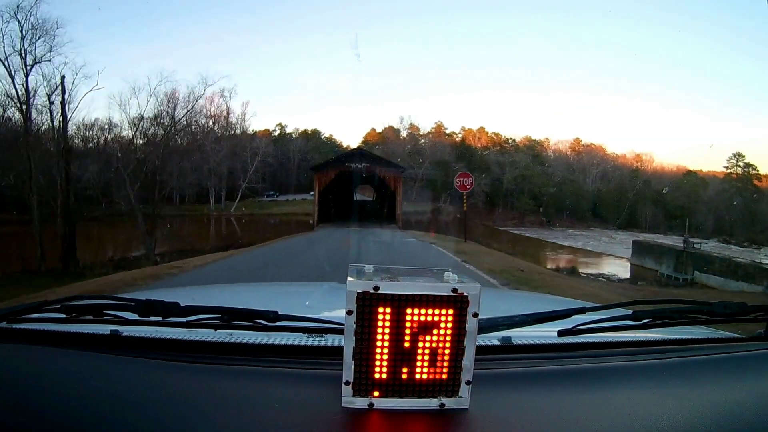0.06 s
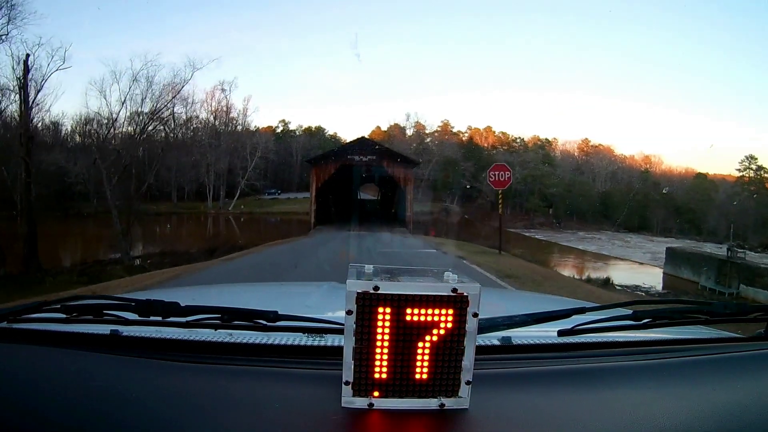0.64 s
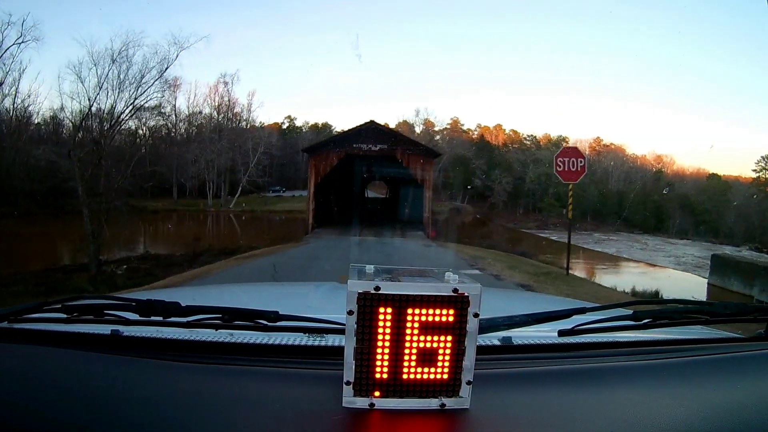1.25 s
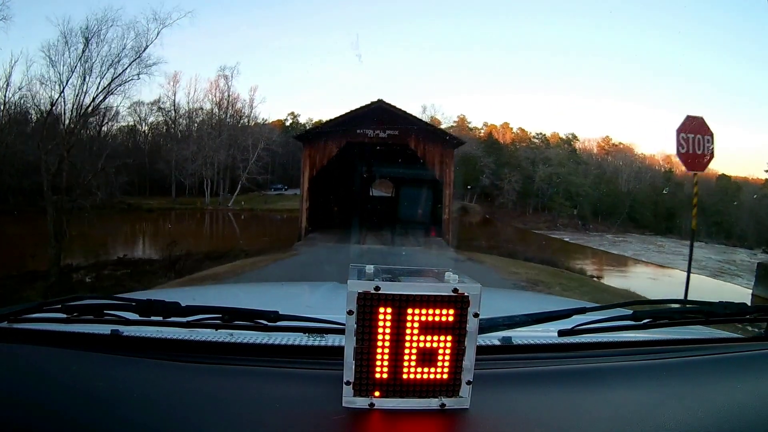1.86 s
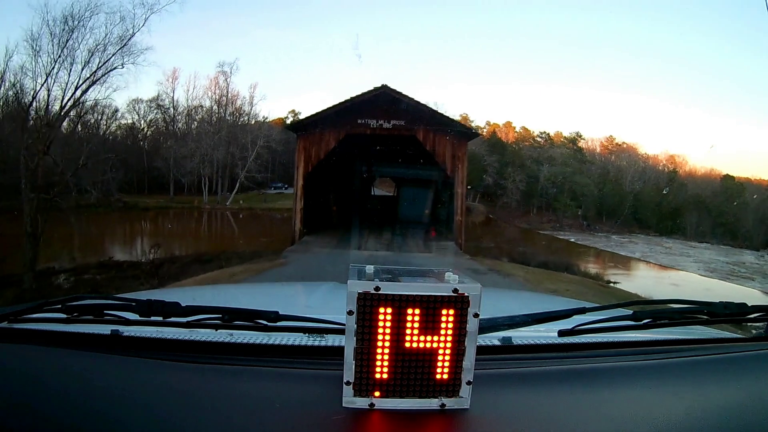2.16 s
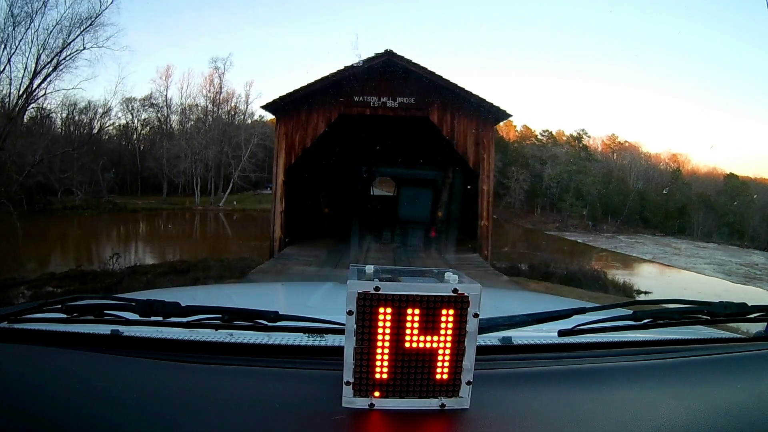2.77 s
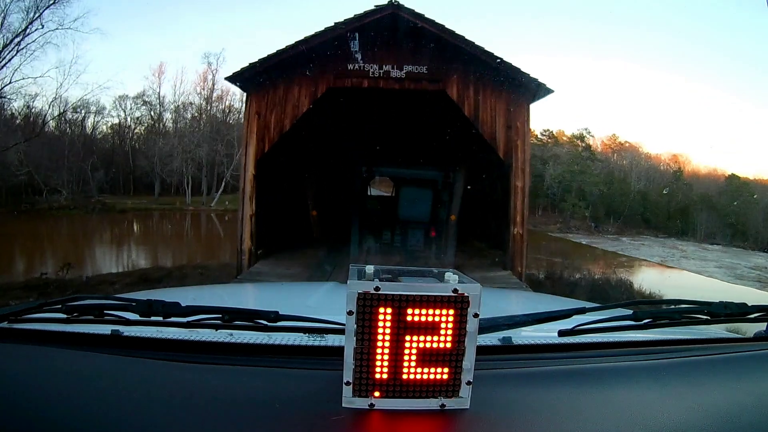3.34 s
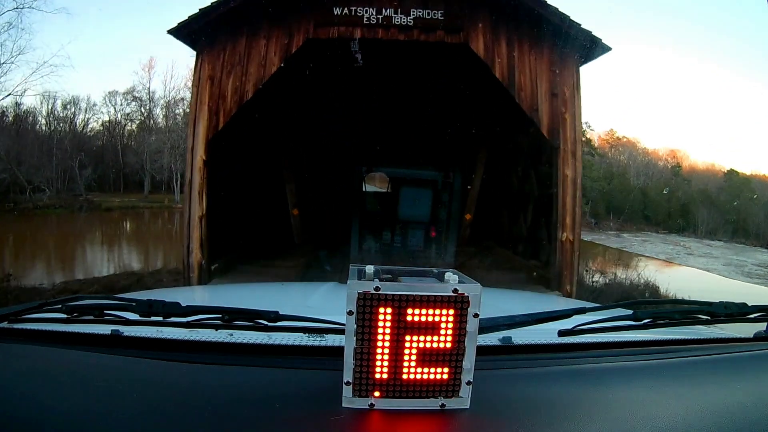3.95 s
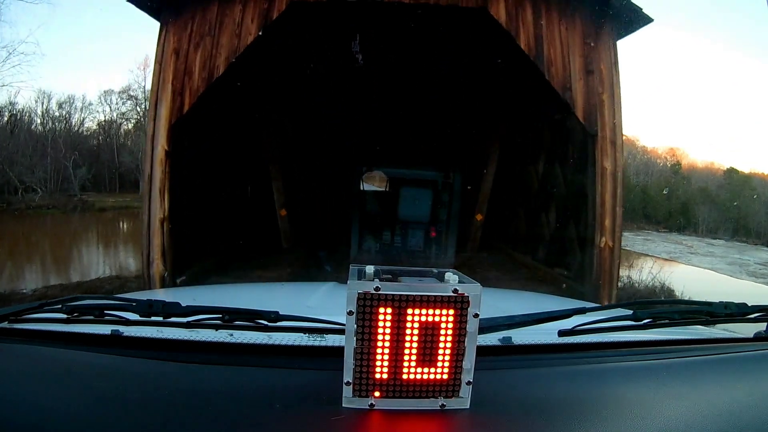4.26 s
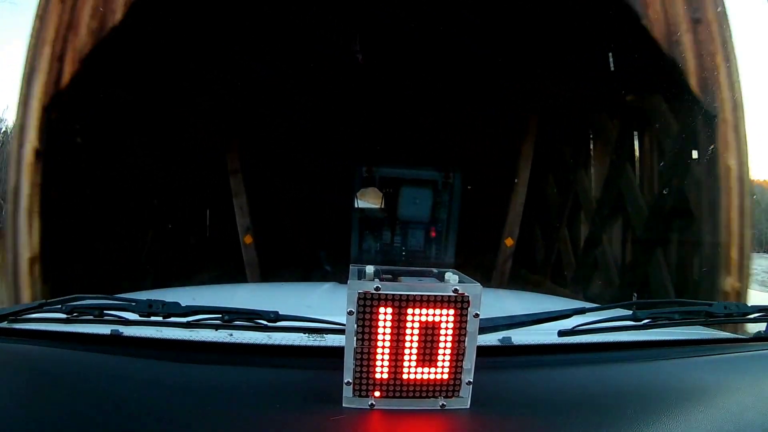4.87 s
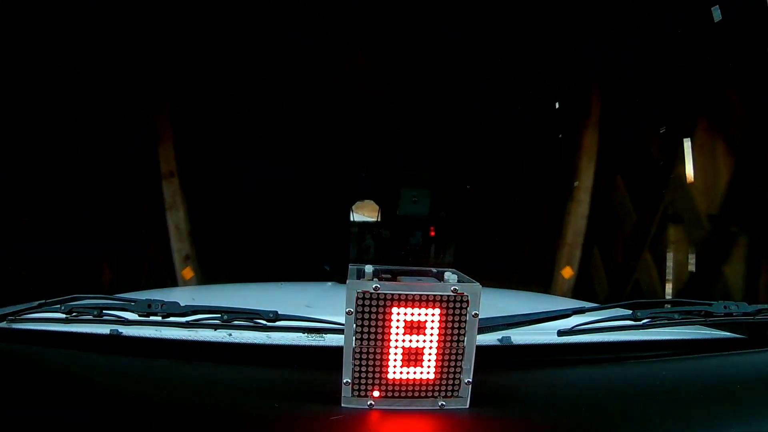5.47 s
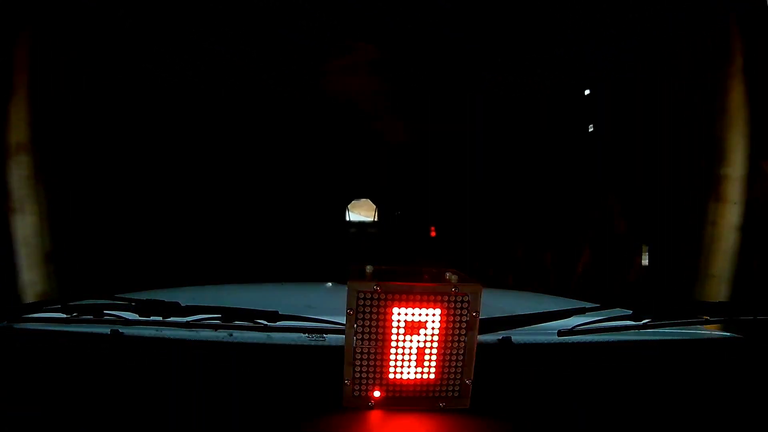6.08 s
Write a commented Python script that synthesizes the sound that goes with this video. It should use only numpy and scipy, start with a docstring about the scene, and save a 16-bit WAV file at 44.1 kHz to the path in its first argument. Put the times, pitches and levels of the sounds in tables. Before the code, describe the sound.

A slowing pickup truck heard from inside, with low engine hum, road rumble and dashboard knocks, then thudding over hollow wooden bridge planks.

```python
"""Pickup truck rolling onto a wooden bridge

Inside the cab, windows shut, microphone at the dashboard. The truck slows steadily down a paved road
and onto the planks; the engine sinks to idle under the tyre rumble, then picks up. Front and rear
wheels cross each joint in turn, rocking the cab and stirring hollow boards and loose fittings.
Heavy jolts thud through the chassis; close by, dashboard trim knocks and ticks."""
import sys
import numpy as np
from scipy import signal
from scipy.fft import rfft, irfft, next_fast_len
from scipy.io import wavfile
from scipy.ndimage import uniform_filter1d, map_coordinates

SR = 44100
rng = np.random.default_rng(int(sys.argv[2]) if len(sys.argv) > 2 else 0)


def generate_wav(sig):
    """Save sig (samples, or channels by samples) to the path in sys.argv[1] as 16-bit PCM at SR."""
    pcm = np.round(np.clip(np.atleast_2d(sig).T, -1, 1) * 32767).astype(np.int16)
    wavfile.write(sys.argv[1], SR, pcm)


N = 269892


def amp(db):
    """Decibels to gain."""
    return 10 ** (np.asarray(db) / 20)


def fade(t, t60):
    """Exponential decay, 60 dB down after t60 seconds."""
    return np.exp(-np.log(1000) * t / t60)


def wobble(rate):
    """A smooth random curve, rate knots a second."""
    knots = rng.standard_normal(int(N * rate / SR) + 4)
    return map_coordinates(knots, [np.arange(N) * rate / SR])


def colour(x, spectrum):
    """Filter x by (frequency [Hz], level [dB]) points."""
    size = next_fast_len(len(x) + 8192)
    hz, db = np.transpose(spectrum)
    gain = amp(np.interp(np.log(np.fft.rfftfreq(size, 1 / SR) + 1), np.log(hz), db))
    return irfft(rfft(x, size) * gain, size)[:len(x)]


def noise(spectrum):
    """Coloured noise of rms 1."""
    x = colour(rng.standard_normal(N), spectrum)
    return x / np.sqrt(np.mean(x ** 2) + 1e-20)


def ring(modes, attack, detune, scatter_db):
    """One blow on a set of modes, peak 1; the point of contact changes their strengths and pitches."""
    t = np.arange(SR // 4) / SR
    hz, db, t60 = np.transpose(modes)[:, :, None]
    strength, pitch, phase = rng.standard_normal((3, len(modes), 1))
    waves = np.sin(2 * np.pi * hz * (1 + detune * pitch) * t + phase)
    onset = 1 - np.exp(-(t / attack) ** 2)
    x = onset * np.sum(amp(db + scatter_db * strength) * fade(t, t60) * waves, axis=0)
    return x / np.abs(x).max()


def crack(spectrum, t60, tail_db, tail_t60):
    """A sharp contact with a short scattered tail in the cab, peak 1."""
    t = np.arange(SR // 4) / SR
    onset = 1 - np.exp(-(t / .0005) ** 2)
    decay = fade(t, t60) + amp(tail_db) * fade(t, tail_t60)
    x = colour(rng.standard_normal(len(t)), spectrum) * onset * decay
    return x / np.abs(x).max()


def add(track, s, sound):
    """Mix a sound into the track at time s."""
    part = track[max(round(s * SR), 0):][:len(sound)]
    part += sound[:len(part)]


START_M_PER_S, BRAKING_M_PER_S2, WHEELBASE_M = 8.3, .75, 3.86
def motion():
    """Time [s], speed [m/s] and distance [m] of the steadily slowing truck."""
    t = np.arange(N) / SR
    speed = START_M_PER_S - BRAKING_M_PER_S2 * t
    return t, speed, np.cumsum(speed) / SR


def pump(start_s=1.4, length_s=1.55, free_hz=1388, sag_hz=52.2):
    """Far in the background, a pump's whine comes up and sags in pitch while it is loaded."""
    progress = np.clip((np.arange(N) / SR - start_s) / length_s, 0, 1)
    load = np.abs(np.sin(np.pi * progress))
    whine = np.sin(2 * np.pi * np.cumsum(free_hz - sag_hz * load) / SR)
    return amp(-72.5 + 2.6 * wobble(15)) * np.sqrt(2 * load) * whine


# Engine, just ahead of the cab: (time [s], firing rate [Hz], level [dB])
ENGINE_RUN = [(0, 38.53, -38), (.55, 35.47, -41), (1.7, 31.3, -47), (3.05, 33, -43), (4.3, 30.1, -48.5),
              (5.3, 29.99, -43), (5.65, 38.5, -37.5), (6.12, 51, -40.5)]
# Its harmonics: (order [multiple of the firing rate], level [dB])
FIRING_ORDERS = [(1, 0), (2, -10), (3, -18.5), (4, -17), (5, -12.5), (6, -17), (7, -17.5), (8, -24)]
def engine(full_throttle_hz_per_s=28, boost_db=6):
    """Firing orders hum through the firewall, each a little unsteady; throttle lifts the upper ones."""
    times, *columns = np.transpose(ENGINE_RUN)
    firing_hz, hum_db = [np.interp(np.arange(N) / SR, times, column) for column in columns]
    climb = np.gradient(firing_hz) * SR / full_throttle_hz_per_s
    throttle = uniform_filter1d(np.clip(climb, 0, 1), size=SR // 5)
    phase = 2 * np.pi * np.cumsum(firing_hz * (1 + .00812 * wobble(9))) / SR
    hum = np.zeros(N)
    for order, db in FIRING_ORDERS:
        gain = amp(db + (order > 1) * boost_db * throttle + 2.16 * wobble(7))
        hum += gain * np.sin(order * phase + rng.uniform(0, 2 * np.pi))
    return amp(hum_db) * hum


# Road noise all around the microphone, three spectra: (frequency [Hz], density [dB])
BODY_SHAKE = [(12, -30.5), (22, -11.5), (35, -1.5), (55, 0.5), (74, 0), (88, -7.5), (130, -19),
              (250, -71.5)]
CAB_AIR_BOOM = [(60, -27), (95, -1), (112, 1.5), (122, 8), (138, -0.5), (168, -3), (190, 1), (215, -0.5),
                (275, -0.5), (305, -9), (400, -12), (450, -19), (700, -36.5), (1500, -80)]
TREAD_RUSH = [(200, -25), (450, 3), (750, 0.5), (1000, -3), (1350, -6), (1600, -11.5), (2000, -15.5),
              (2400, -21), (3200, -25), (4300, -29.5), (7000, -40.5), (14000, -67)]
def road():
    """Uneven pavement shakes the body; tyres drone and rush through the glass. All ease with speed."""
    _, speed, _ = motion()
    halvings = np.log2(START_M_PER_S / speed)
    texture = wobble(25)
    shake = amp(-39.2 - 7.3 * halvings) * noise(BODY_SHAKE)
    drone = amp(-39 - 7 * halvings + 1.08 * texture) * noise(CAB_AIR_BOOM)
    tread = amp(-56.5 - .76 * halvings + .56 * texture + .41 * wobble(60)) * noise(TREAD_RUSH)
    return shake + drone + tread


# Plastic ticks close to the microphone: (time [s], level [dB], top edge [Hz])
TRIM_TICKS = [(.424, -53.5, 3400), (.608, -51, 4900), (.816, -53.5, 6800), (1.35, -56, 4300),
              (1.797, -57, 5500), (3.633, -57.5, 5000), (3.685, -57, 5000), (3.863, -52, 6000),
              (4.549, -54.5, 5500), (4.913, -55.5, 6800), (5.486, -45, 6600), (5.891, -52, 7000)]
# Ring of the plastic: (frequency [Hz], level [dB], t60 [s])
PLASTIC_MODES = [(2094, 0.5, 0.077), (2360, 1.5, 0.046), (2885, -1.5, 0.037), (3300, -9, 0.044),
                 (4160, -4, .06), (4620, -10, .04), (5880, -9, 0.043), (6370, -14.5, 0.031)]
# Snap of the contact: (frequency [Hz], density [dB])
PLASTIC_SNAP = [(700, -23), (1700, 6), (2500, 1.5), (4500, -6.5), (6500, -9.5), (7800, -28), (12000, -33)]
# Trim rubbing briefly: (time [s], peak [dB], pitch [Hz])
TRIM_SQUEAKS = [(.28, -50, 1116), (4.528, -49, 1380), (4.757, -50, 1055), (5.355, -51, 1026)]
def trim(settle_s=.009, settle_db=-9):
    """Small plastic parts tick, touch again more weakly, and squeak."""
    out = np.zeros(N)
    for s, db, top_hz in TRIM_TICKS:
        lowpass = signal.butter(4, top_hz, fs=SR, output='sos')
        for delay, drop_db in [(0, 0), (settle_s, settle_db)]:
            body = amp(-3) * ring(PLASTIC_MODES, attack=.0005, detune=.03, scatter_db=2)
            snap = crack(PLASTIC_SNAP, t60=.01, tail_db=-14, tail_t60=.07)
            add(out, s + delay, amp(db + drop_db) * signal.sosfilt(lowpass, body + snap))
    t = np.arange(SR // 50) / SR
    for s, db, hz in TRIM_SQUEAKS:
        add(out, s - t.mean(), amp(db) * np.hanning(len(t)) * np.sin(2 * np.pi * hz * t))
    return out


# Dashboard panel, close up: (time [s], level [dB], hard edge [relative dB], rebound [relative dB])
PANEL_KNOCKS = [(.759, -35, -5, 0.5), (.784, -42, -3, -20), (1.031, -43, -11, -2.5),
                (1.588, -44.5, -26, -10), (2.987, -40, -11.5, -20), (3.017, -43, -11, -20),
                (3.162, -37.5, -19, 1.5), (3.275, -40, -25, -18), (3.501, -41.5, -19, -20),
                (3.592, -39.5, -21, -3.5), (3.69, -45.5, -8, -20), (3.833, -45, -11, -17),
                (3.858, -32.5, -21, -6.5), (4.211, -40.5, -22, -20), (4.351, -41.5, -14, -22),
                (4.492, -40, -12, -2), (4.61, -34, -20, -6.5), (4.912, -39.5, -10.5, -20),
                (5.034, -44, -8, -20), (5.054, -42, -18, -20), (5.067, -46.5, 1.5, -22),
                (5.486, -45.5, -1, -20), (5.933, -36, -15, -20), (6.092, -36, -11.5, -20)]
# Ring of the panel: (frequency [Hz], level [dB], t60 [s])
PANEL_MODES = [(663.4, -1, 0.047), (751, -1.5, 0.05), (854, -3.5, 0.034), (998, -14.5, 0.028),
               (1162, -12, 0.043), (1368, -18.5, 0.036)]
# Its hard contact: (frequency [Hz], density [dB])
PANEL_EDGE = [(700, -22), (1200, -14.5), (1700, 7), (2050, 6.5), (2450, -17), (3500, -21.5), (7000, -50),
              (12000, -70)]
def panel(rebound_s=.056, settle_s=.006, settle_db=-5):
    """A loose panel knocks, swings back to strike again, and chatters once after each contact."""
    out = np.zeros(N)
    for s, db, edge_db, rebound_db in PANEL_KNOCKS:
        for hit_s, hit_db in [(s, db), (s + rebound_s, db + rebound_db)]:
            for delay, drop_db in [(0, 0), (settle_s * rng.uniform(.7, 1.3), settle_db)]:
                body = ring(PANEL_MODES, attack=.0013, detune=.025, scatter_db=2.5)
                edge = amp(edge_db) * crack(PANEL_EDGE, t60=.011, tail_db=-15, tail_t60=.072)
                add(out, hit_s + delay, amp(hit_db + drop_db) * (body + edge))
    return out


def fittings(count=250):
    """Loose fittings around the cab tap at random, harder and more often while the truck rocks."""
    out = np.zeros(N)
    shaking = np.hypot(amp(-52.5), amp(-15.5) * rocking())  # smooth road plus jolts
    times = np.interp(rng.uniform(0, 1, count), np.cumsum(shaking) / shaking.sum(), np.arange(N) / SR)
    for s, pitch, force in zip(times, rng.uniform(.9, 1.602, count), rng.standard_normal(count)):
        modes = np.array(PANEL_MODES) * [pitch, 1, 1 / pitch]  # smaller parts ring higher and shorter
        body = ring(modes, attack=.0011, detune=.054, scatter_db=2)
        snap = amp(-14.5) * crack(PLASTIC_SNAP, t60=.0096, tail_db=-11.5, tail_t60=.057)
        add(out, s, amp(2 * np.tanh(force)) * (body + snap))
    return out * shaking


# Joints and humps under the wheels: (front crossing time [s], front jolt [dB], rear jolt [dB])
ROAD_JOINTS = [(.27, -31, -36), (3.075, -31.5, -29.5), (3.125, -30, -40), (4.469, -29.5, -28),
               (4.515, -28, -26.5), (4.6, -31, -48), (4.654, -29, -30)]
def jolts():
    """Time [s] and level [dB] of each axle on each joint; the rear follows one wheelbase later."""
    t, _, metres = motion()
    for front_s, front_db, rear_db in ROAD_JOINTS:
        joint_m = np.interp(front_s, t, metres)
        yield front_s, front_db
        yield np.interp(joint_m + WHEELBASE_M, metres, t), rear_db


def rocking(rise_s=.03, t60=.74):
    """How hard the truck rocks: every jolt adds energy that dies away."""
    energy = np.zeros(N)
    for s, db in jolts():
        age = np.maximum(np.arange(N) / SR - s, 0)
        energy += (amp(db) * (1 - np.exp(-age / rise_s)) * fade(age, t60)) ** 2
    return np.sqrt(energy)


# Bridge planks, heard through the floor: (frequency [Hz], density [dB])
HOLLOW_BOARDS = [(150, -21.5), (240, -2.5), (310, 1), (390, 1), (460, -11.5), (700, -16.5), (1200, -36),
                 (3000, -55)]
def deck(arrival_s=2.98, entry_s=.6, growth_db_per_m=.78):
    """The boards rumble hollowly under the tyres, louder further along the span and after jolts."""
    t, _, metres = motion()
    on_deck = np.clip((t - arrival_s) / entry_s, 0, 1)
    along_m = metres - np.interp(arrival_s, t, metres)
    rolling = amp(-63.5 + growth_db_per_m * along_m)
    drive = np.hypot(rolling, amp(-21) * rocking())
    return on_deck * drive * amp(1.6 * wobble(13)) * noise(HOLLOW_BOARDS)


# The cab on its springs and the chassis below it: (frequency [Hz], level [dB], t60 [s])
CAB_MODES = [(27.2, -1, 0.29), (44.5, -2, 0.21), (60.7, -14, 0.13), (114.4, -16, 0.17)]
CHASSIS_MODES = [(186.7, -3.5, 0.28), (281.3, -1, .2), (327, -2, 0.076), (393, -13, 0.086),
                 (464, -5, 0.058), (587, -9.5, 0.075), (678, -10, 0.07), (784, -10, 0.052),
                 (1040, -18, 0.047), (1307, -20, 0.063)]
# Heavy jolts coming up through the suspension: (time [s], peak [dB])
HEAVY_THUDS = [(0.607, -33.5), (3.695, -40), (4.815, -24.7), (4.836, -31), (5.378, -35.5), (5.514, -33.5),
               (5.542, -36), (5.733, -36)]
def suspension():
    """Each joint bounces the cab on its springs; heavy jolts thud through the chassis."""
    out = np.zeros(N)
    for s, db in jolts():
        add(out, s, amp(db) * ring(CAB_MODES, attack=.0086, detune=.062, scatter_db=2))
    for s, db in HEAVY_THUDS:
        add(out, s, amp(db) * ring(CHASSIS_MODES, attack=.0005, detune=.0074, scatter_db=1.1))
    return out


def scene():
    """Everything as heard at the dashboard, in mono."""
    return (engine() + pump() + road() + deck() + suspension() + panel() + trim() + fittings())[None]


# The microphone's own noise: (frequency [Hz], density [dB])
MIC_HISS = [(100, 5), (7000, 1), (12000, 1), (15500, 6)]
def record(dry, hiss_db=-78, top_hz=15750):
    """The microphone adds faint hiss; nothing above the band limit is kept."""
    size = next_fast_len(N + 8192)
    with_hiss = dry + amp(hiss_db) * noise(MIC_HISS)
    passband = np.fft.rfftfreq(size, 1 / SR) < top_hz
    return irfft(rfft(with_hiss, size) * passband, size)[:, :N]


dry = scene()
out = record(dry)
generate_wav(out)
```